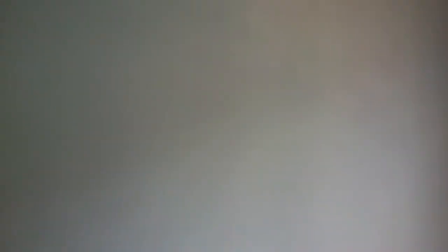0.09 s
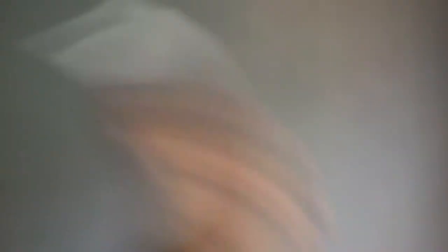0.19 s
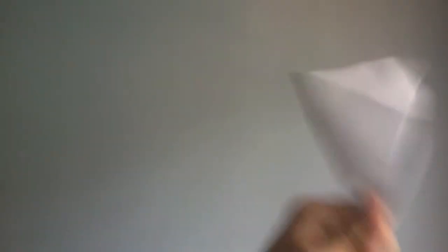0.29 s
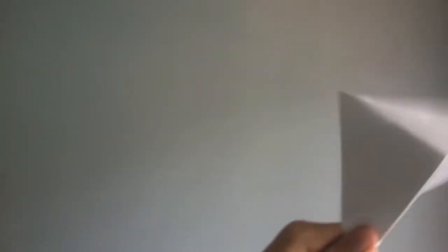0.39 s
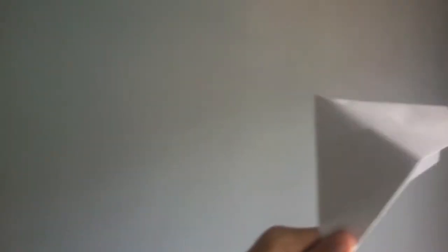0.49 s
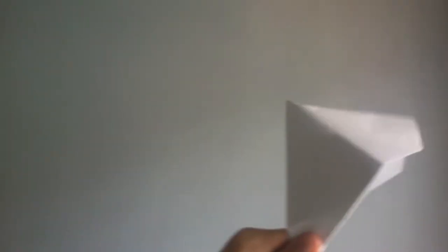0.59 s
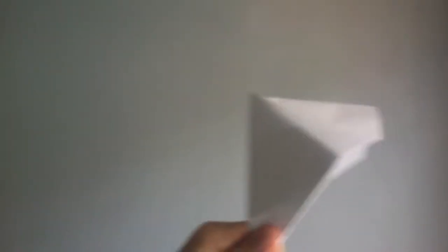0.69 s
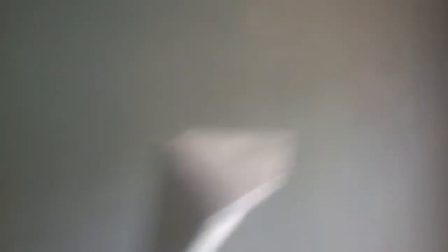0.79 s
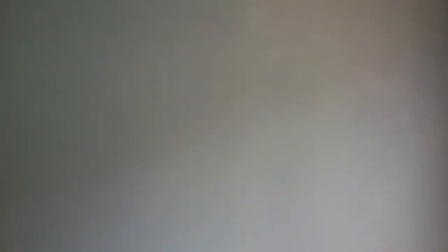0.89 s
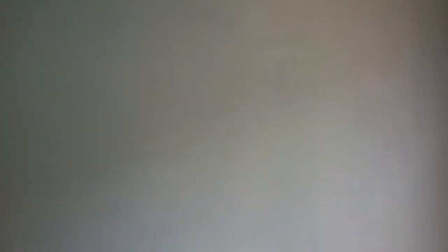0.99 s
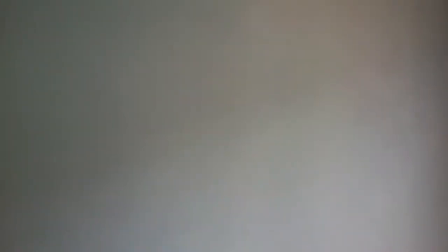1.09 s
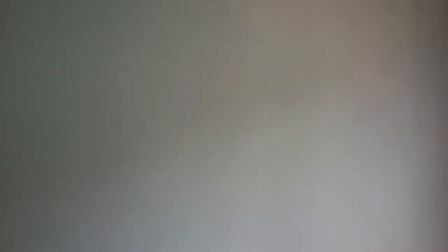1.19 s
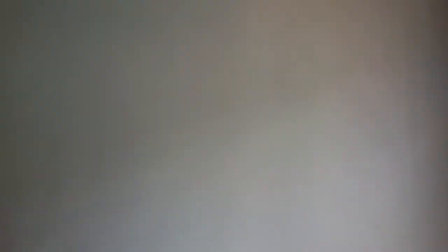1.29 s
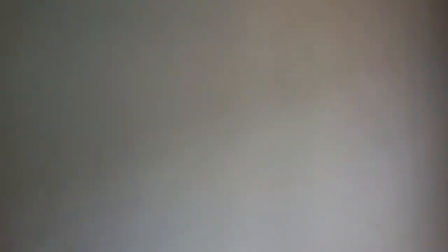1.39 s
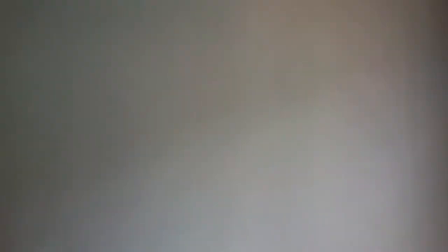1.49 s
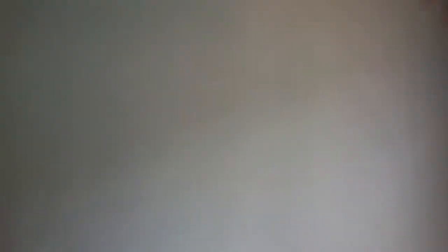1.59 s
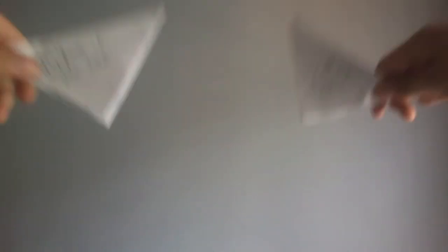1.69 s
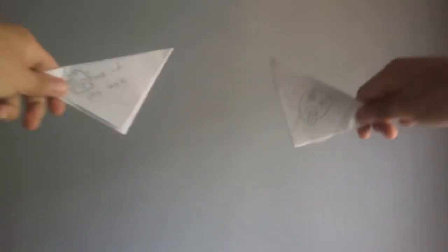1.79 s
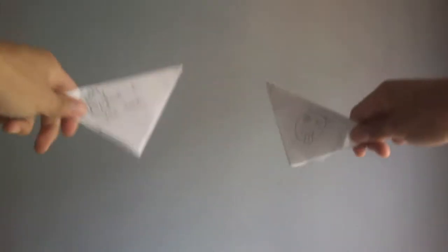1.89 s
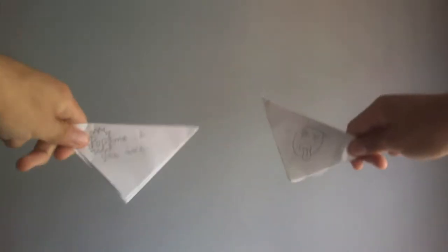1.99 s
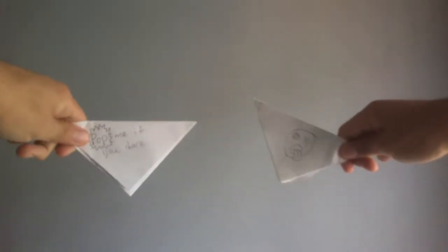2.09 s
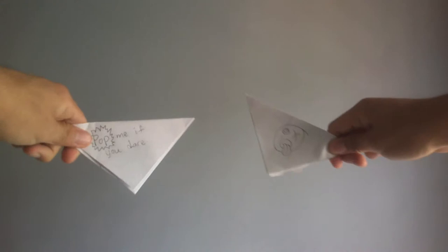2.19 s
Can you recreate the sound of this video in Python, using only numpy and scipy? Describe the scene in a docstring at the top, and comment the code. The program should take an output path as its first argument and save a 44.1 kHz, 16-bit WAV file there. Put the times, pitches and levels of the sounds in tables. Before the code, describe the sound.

After a slight rustle, a folded paper popper cracks once, sharp and loud, at about 0.2 seconds. The small bare room rings and dies away within a second. Around 1.1 seconds come a soft dull bump and quiet paper swishes. The faint rumble and hiss drop out briefly near 1.35 seconds, then a fainter bump and swishes follow around 1.5 seconds, with barely audible rustling near 2 seconds.

```python
"""A small bare room, one mono microphone, low rumble and faint hiss. After a slight rustle a folded
paper popper is whipped down once: the flap sucks in air, slams taut and cracks. Near walls answer and
the room rings out. About a second later come soft swishes and bumps of handling; the sound fades out
and straight back in, and the last faint handling follows."""
import sys
import numpy as np
from scipy import signal
from scipy.fft import rfft, irfft, next_fast_len
from scipy.io import wavfile
from scipy.ndimage import map_coordinates

SR = 44100
rng = np.random.default_rng(int(sys.argv[2]) if len(sys.argv) > 2 else 0)


def wav_record(signal):
    """Record a signal, one row per channel, as 16-bit PCM in the file named by sys.argv[1]."""
    frames = np.transpose(np.atleast_2d(signal))
    bounded = np.clip(frames, -1, 1)
    # unit amplitude maps onto the largest positive 16-bit level
    quanta = np.round(bounded * 32767).astype(np.int16)
    wavfile.write(sys.argv[1], SR, quanta)


N = 97020
SNAP_S = .2038  # the flap whips out


def amp(db):
    """Decibels to gain."""
    return 10 ** (np.asarray(db) / 20)


def unit(x):
    """Scale to rms 1."""
    return x / np.sqrt(np.mean(x ** 2) + 1e-20)


def along(points, hz):
    """(Hz, value) points read on a log frequency axis."""
    freqs, values = np.transpose(points)
    return np.interp(np.log(hz + 1), np.log(freqs + 1), values)


def filtered(x, response):
    """x through a frequency response."""
    size = next_fast_len(N + SR // 2)
    return irfft(rfft(x, size) * response(np.fft.rfftfreq(size, 1 / SR)), size)[:N]


def noise(spectrum):
    """Coloured noise of rms 1."""
    return unit(filtered(rng.standard_normal(N), lambda hz: amp(along(spectrum, hz))))


def since(start):
    """Seconds from a moment, per sample."""
    return np.arange(N) / SR - start


def decay(t, t60):
    """Full level until t = 0, then 60 dB down every t60 seconds."""
    return np.exp(-np.log(1000) * np.maximum(t, 0) / t60)


def burst(t, rise, t60):
    """Quick rise and exponential decay, times in seconds."""
    return (1 - np.exp(-np.maximum(t, 0) / rise)) * decay(t, t60)


def lobe(t, width):
    """A bell curve peaking at t = 0."""
    return np.exp(-.5 * (t / width) ** 2)


def wobble(per_s):
    """A smooth random curve, per_s knots a second."""
    return map_coordinates(rng.standard_normal(N // 8), [np.arange(N) * per_s / SR], mode="mirror")


def swells(rows):
    """Smooth rises and falls of level, one per row."""
    return sum(amp(db) * lobe(since(peak), np.where(since(peak) < 0, rise, fall))
               for peak, db, rise, fall in rows)


# Room tone, low and high. Each row: frequency in Hz, relative density in dB.
RUMBLE_SPECTRUM = [(15, -1.5), (30, -5), (45, 1.5), (70, -13.5), (120, -12.5), (180, -19), (400, -30.5),
                   (1500, -63.5)]
HISS_SPECTRUM = [(100, 0), (300, 1), (600, 0.5), (1200, -4.5), (2200, -6), (3500, -11), (8000, -15.5),
                 (15500, -18)]

def room_tone():
    """The room's steady low rumble and faint hiss."""
    return amp(-63.5) * noise(RUMBLE_SPECTRUM) + amp(-73) * noise(HISS_SPECTRUM)


# Paper being handled. Each row: peak time in seconds, level in dB, rise and fall in seconds.
SWISH_SWELLS = [(.15, -72, 0.068, 0.025), (.97, -76, .03, .05), (1.135, -61, .018, .025),
                (1.172, -60.5, .014, .02), (1.22, -66, .025, .05), (1.48, -77.5, .06, 0.04),
                (1.56, -74, 0.016, 0.022), (1.615, -72.5, 0.019, 0.079)]
# Its colour. Each row: frequency in Hz, relative density in dB.
SWISH_SPECTRUM = [(100, -4), (300, -0.5), (650, 1), (1500, 2), (3000, -2.5), (5000, -2), (7500, -1),
                  (10000, -5), (15500, -9.5)]

def paper_swishes():
    """Paper catches as it slides, making soft, grainy swishes."""
    grain_db = 2 * wobble(per_s=420)
    return swells(SWISH_SWELLS) * unit(noise(SWISH_SPECTRUM) * amp(grain_db))


# Toys being moved. Each row: peak time in seconds, level in dB, rise and fall in seconds.
RUSTLE_SWELLS = [(.175, -76.5, 0.049, 0.01), (1.08, -72, 0.017, 0.015), (1.97, -84, 0.021, .04),
                 (2.15, -77, 0.057, 0.042)]
# Their colour. Each row: frequency in Hz, relative density in dB.
RUSTLE_SPECTRUM = [(200, -9.5), (800, -3.5), (1500, -5), (2300, 3), (3000, -2), (4500, -13), (12000, -27)]

def toy_rustles():
    """The toys rustle as they are moved, barely reaching the microphone."""
    return swells(RUSTLE_SWELLS) * noise(RUSTLE_SPECTRUM)


# The stretched paper panel's modes. Each row: frequency in Hz, level in dB, T60 in seconds.
PANEL_MODES = [(1450, -13, .007), (2000, -11, .007), (3370, -16, 0.0056), (4840, -13.5, 0.004)]
# The paper's crack. Each row: frequency in Hz, relative density in dB.
CRACK_SPECTRUM = [(100, -24.5), (700, -14.5), (1200, -7.5), (2200, -4), (2700, -9.5), (3200, 0),
                  (4000, -4.5), (5500, -0.5), (7400, -5.5), (9700, -6), (11700, 1.5), (15500, -9.5)]

def popper():
    """The flap sucks in air and pushes it out; the taut sheet rings briefly, cracks and shivers."""
    t = since(SNAP_S)
    crack_lag_s, panel_lag_s, slam_lag_s = .00025, .0005, .00075
    suction = lobe(t, width=.0001)
    compression = lobe(t - slam_lag_s, width=.0001)
    push = amp(-6) * (compression - suction)
    struck = np.maximum(t - panel_lag_s, 0)
    ring = sum(amp(db) * decay(struck, t60) * np.sin(2 * np.pi * hz * struck)
               for hz, db, t60 in PANEL_MODES)
    dense_noise = unit(np.tanh(noise(CRACK_SPECTRUM) / 2))
    crack = amp(-9) * burst(t - crack_lag_s, rise=.00015, t60=.007) * dense_noise
    shiver = amp(-30) * burst(t, rise=.00015, t60=.051) * noise(CRACK_SPECTRUM)
    return push + ring + crack + shiver


# Near surfaces. Each row: delay behind the direct sound in seconds, level in dB.
WALL_ECHOES = [(.0052, -15), (.0062, -13.5), (.0083, -15.5), (0.0099, -13), (.021, -17)]

def wall_echoes(snap, cutoff_hz=3500):
    """Near walls send duller copies of the snap to the microphone."""
    echoes = lambda hz: sum(amp(db) * np.exp(-2j * np.pi * hz * delay) for delay, db in WALL_ECHOES)
    return filtered(snap, lambda hz: echoes(hz) / (1 + 1j * hz / cutoff_hz))


# The bare room's reverberation and late ring. Each row: frequency in Hz, relative density in dB.
REVERB_SPECTRUM = [(40, -13), (90, -13.5), (180, -11.5), (250, -5.5), (300, -10.5), (360, -4.5),
                   (415, -5.5), (500, -3), (750, -2), (1050, -0.5), (1350, -1), (1560, -6), (1900, .5),
                   (2300, .5), (2650, -9.5), (3200, -7.5), (3900, -13), (5200, -12), (8200, -15),
                   (10000, -16.5), (12500, -17), (15500, -21.5)]
LATE_SPECTRUM = [(60, -14), (250, -2.5), (900, 0.5), (2300, -5), (2700, -13), (6000, -19.5), (15000, -46)]
# The reverberation's decay. Each row: frequency in Hz, T60 in seconds.
REVERB_T60 = [(100, 0.81), (300, .58), (1000, 0.59), (2200, 0.41), (5000, 0.54), (9000, 0.47), (15000, .36)]
# Room resonances that stand out. Each row: frequency in Hz, level in dB, T60 in seconds.
ROOM_RESONANCES = [(248, -43, 0.97), (366, -37, .45), (605, -41.5, .5), (783, -41.5, 0.5),
                   (1010, -41.5, .55), (1342.3, -42.5, .6), (1897, -43, .6), (2075, -44, .6),
                   (2213, -40.5, 0.45)]

def room_ring(build_s=.003):
    """Diffuse reverberation whose treble dies first, a slow late ring and a few resonances."""
    t = since(SNAP_S)
    band_hz, frame_s, bands = signal.stft(noise(REVERB_SPECTRUM), SR, nperseg=256)
    bands *= decay(frame_s - SNAP_S, along(REVERB_T60, band_hz)[:, None])
    tail = signal.istft(bands, SR, nperseg=256)[1][:N]
    diffuse = amp(-24) * tail * burst(t, build_s, t60=np.inf)
    late = amp(-40.5) * noise(LATE_SPECTRUM) * burst(t, build_s, t60=1.396)
    resonances = np.zeros(N)
    for hz, db, t60 in ROOM_RESONANCES:
        tone = np.sin(2 * np.pi * (hz * t + rng.random()))
        waver = 1 + .5 * wobble(per_s=24)  # close resonances beat against each other
        resonances += amp(db) * burst(t, build_s, t60) * tone * waver
    return diffuse + late + resonances


# Handling bumps. Each row: peak time in seconds, level in dB, rise and fall in seconds.
BUMP_SWELLS = [(1.095, -57, .018, .035), (1.47, -72, 0.022, .03)]
# Their colour. Each row: frequency in Hz, relative density in dB.
BUMP_SPECTRUM = [(20, -7.5), (52, -1.5), (90, -12), (160, -16), (260, -23), (600, -23), (1500, -34),
                 (5000, -56)]

def handling_bumps():
    """Handling makes two dull, bass-heavy bumps."""
    return swells(BUMP_SWELLS) * noise(BUMP_SPECTRUM)


def fade(silent_s=1.3465, out_s=.08, in_s=.071):
    """The gain ramps down to silence and straight back up."""
    t = since(silent_s)
    return np.minimum(np.abs(t) / np.where(t < 0, out_s, in_s), 1)


def microphone(hz, notch_hz=2682, width_hz=140, depth=.33, top_hz=15800):
    """The microphone's response: a narrow hollow and a band limit."""
    damping = 1j * hz * width_hz
    notch = 1 - depth * damping / (notch_hz ** 2 - hz ** 2 + damping)
    band_limit = np.clip((top_hz - hz) / 400 + .5, 0, 1)
    return notch * band_limit


def scene():
    """Everything reaches one spot in the room, the same in both channels."""
    snap = popper()
    mono = room_tone() + paper_swishes() + toy_rustles()
    mono += snap + wall_echoes(snap) + room_ring() + handling_bumps()
    return np.array([mono, mono])


def record(dry):
    """The brief fade, then the microphone's colour."""
    return np.array([filtered(channel * fade(), microphone) for channel in dry])


dry = scene()
out = record(dry)
wav_record(out)
```